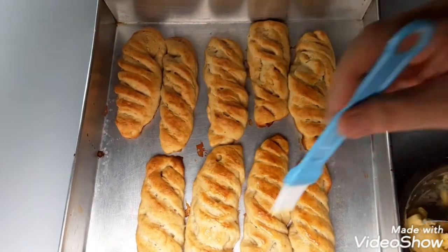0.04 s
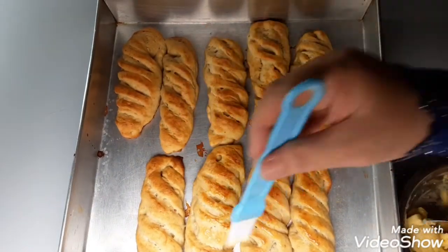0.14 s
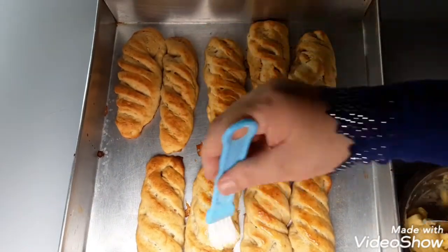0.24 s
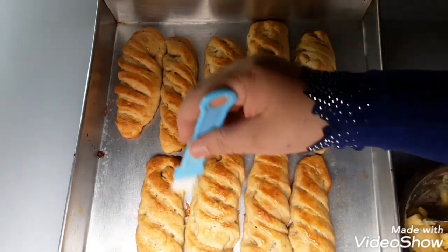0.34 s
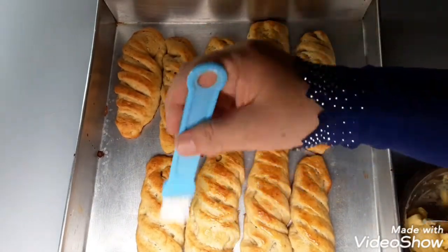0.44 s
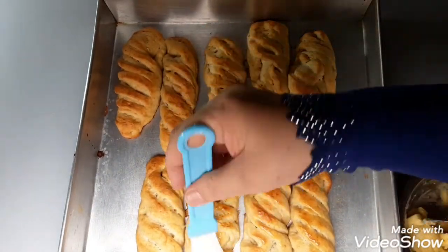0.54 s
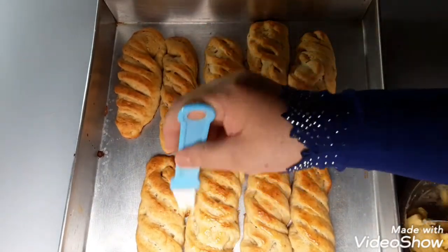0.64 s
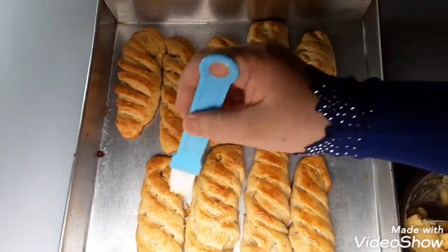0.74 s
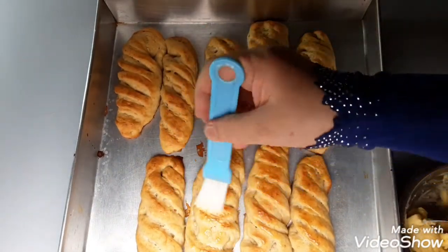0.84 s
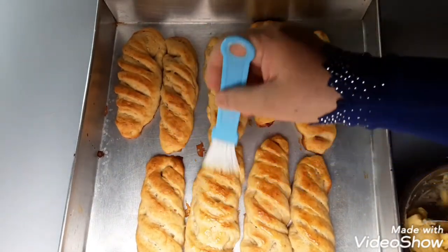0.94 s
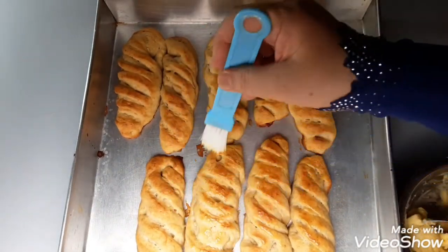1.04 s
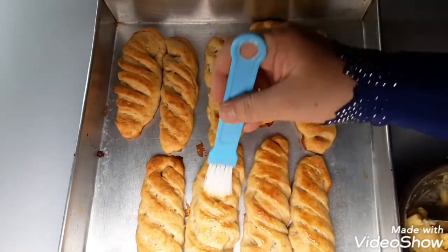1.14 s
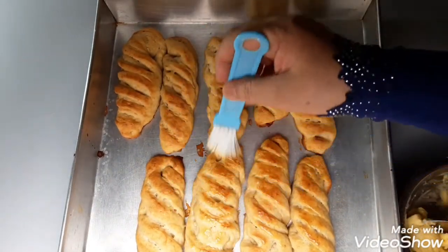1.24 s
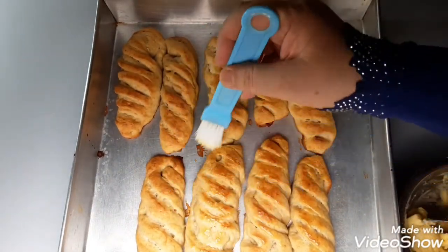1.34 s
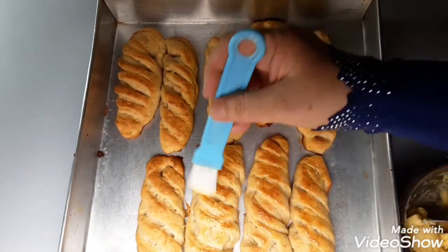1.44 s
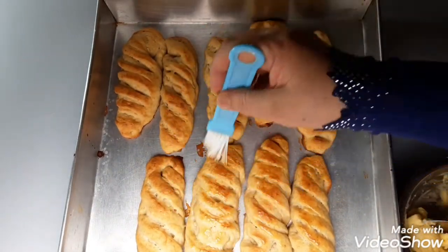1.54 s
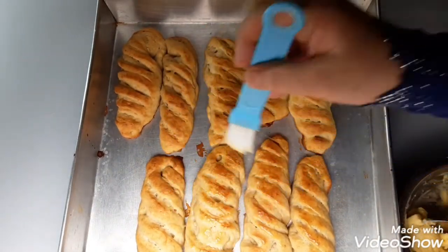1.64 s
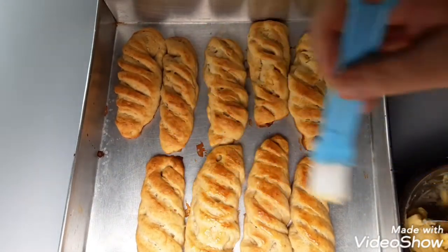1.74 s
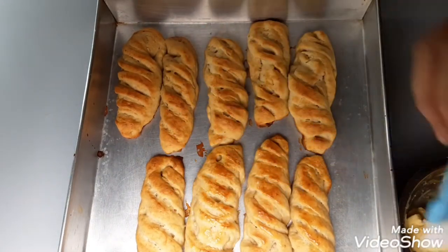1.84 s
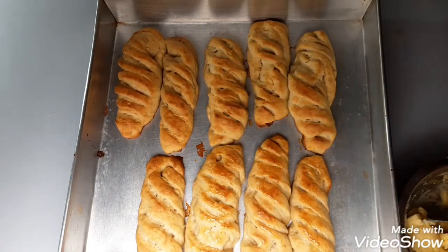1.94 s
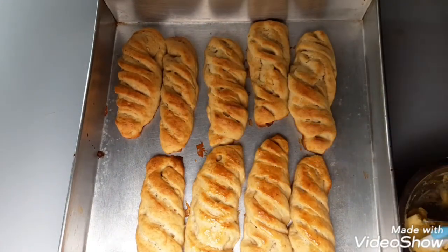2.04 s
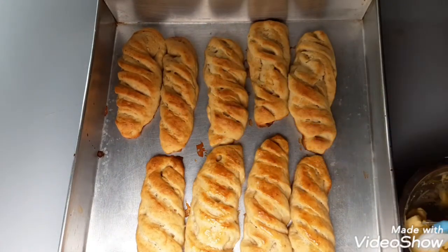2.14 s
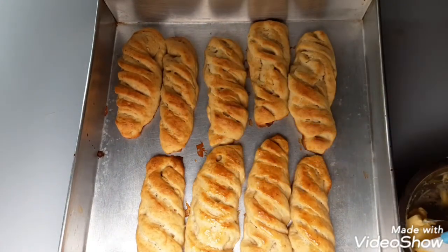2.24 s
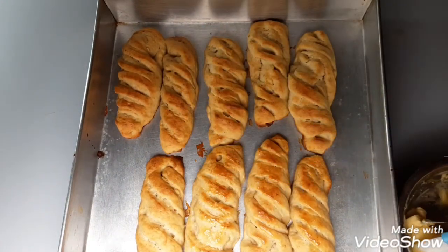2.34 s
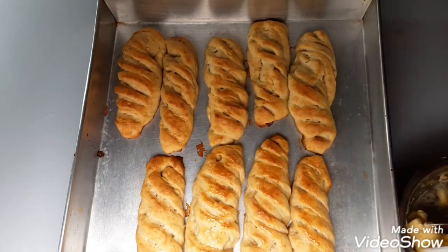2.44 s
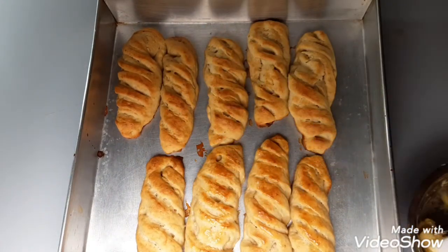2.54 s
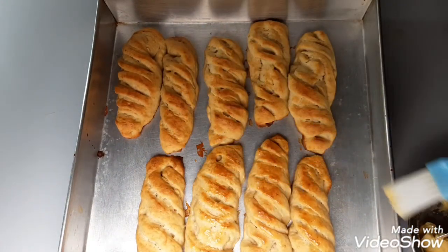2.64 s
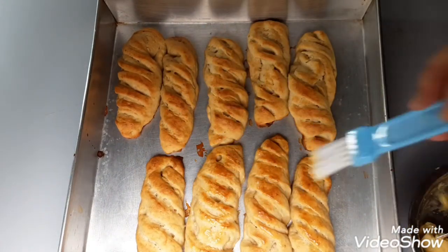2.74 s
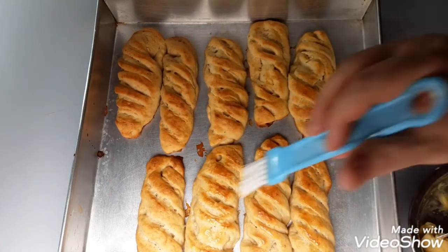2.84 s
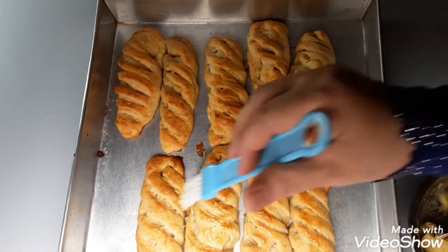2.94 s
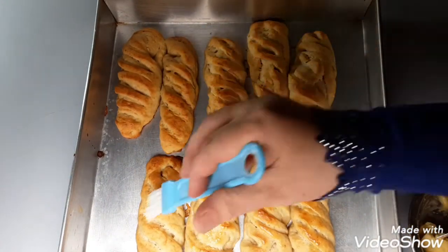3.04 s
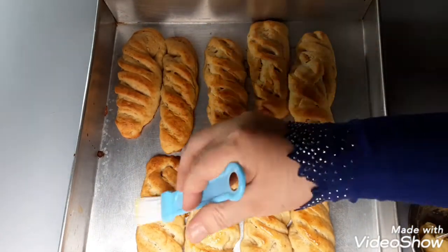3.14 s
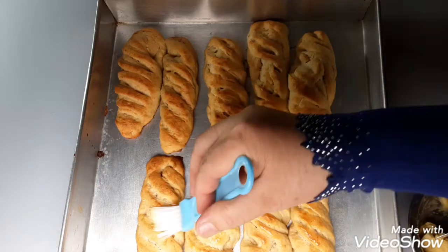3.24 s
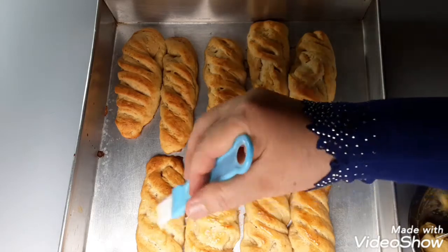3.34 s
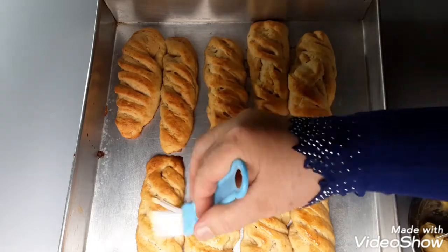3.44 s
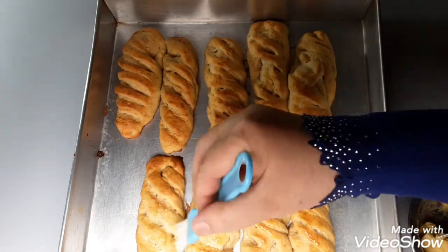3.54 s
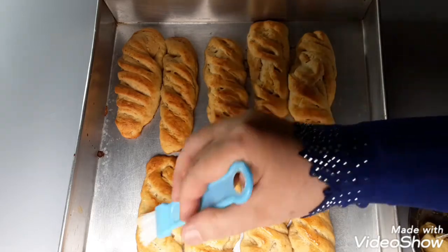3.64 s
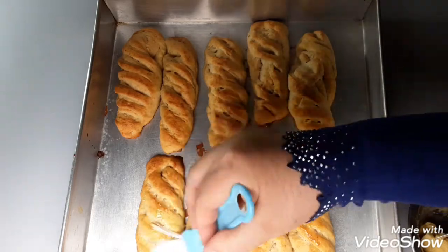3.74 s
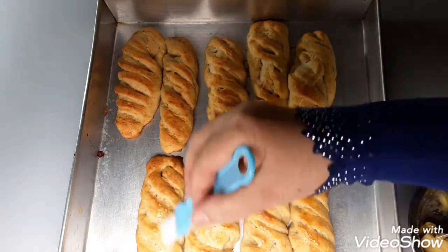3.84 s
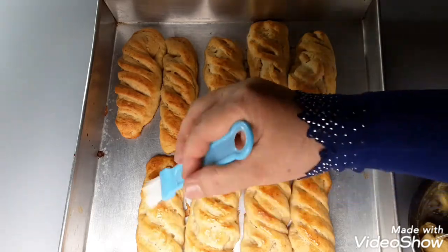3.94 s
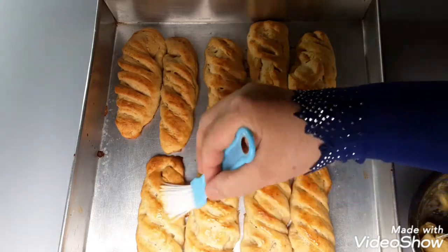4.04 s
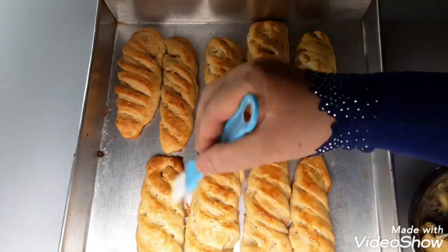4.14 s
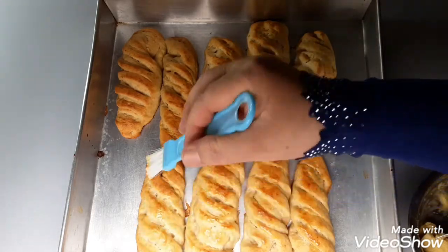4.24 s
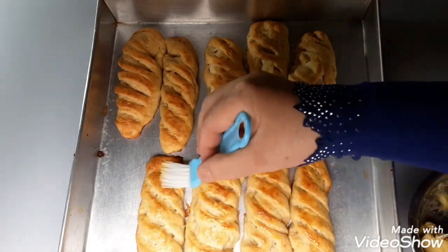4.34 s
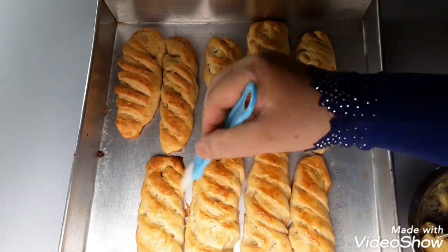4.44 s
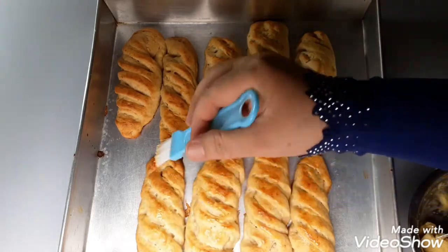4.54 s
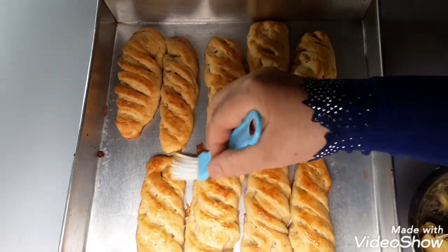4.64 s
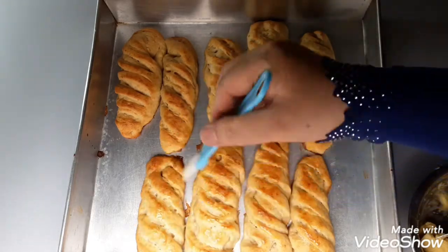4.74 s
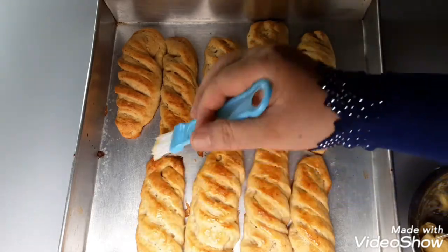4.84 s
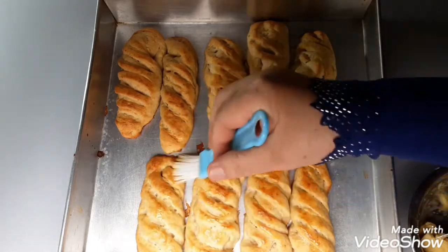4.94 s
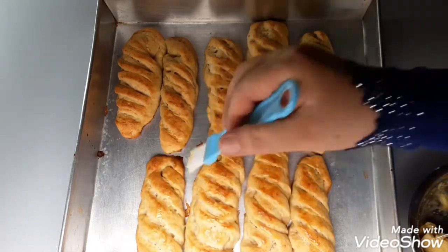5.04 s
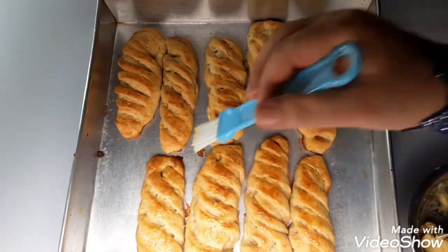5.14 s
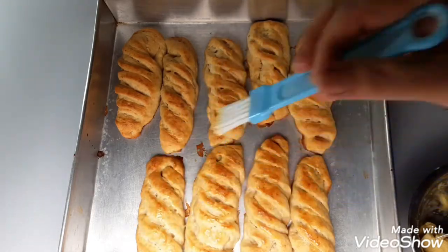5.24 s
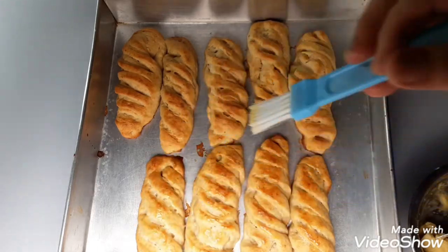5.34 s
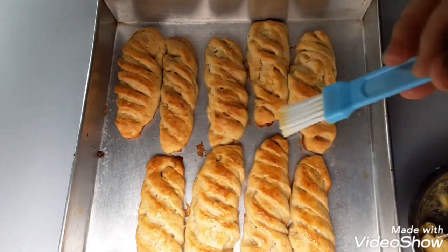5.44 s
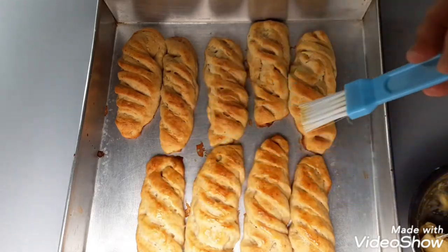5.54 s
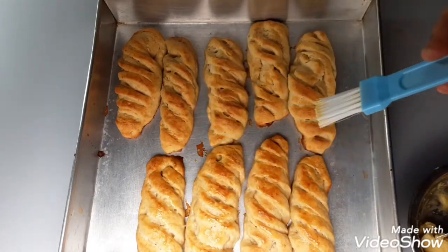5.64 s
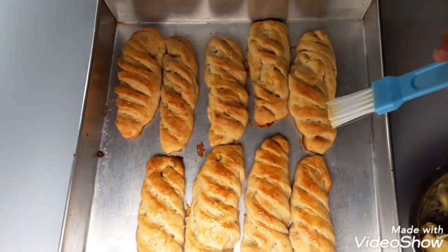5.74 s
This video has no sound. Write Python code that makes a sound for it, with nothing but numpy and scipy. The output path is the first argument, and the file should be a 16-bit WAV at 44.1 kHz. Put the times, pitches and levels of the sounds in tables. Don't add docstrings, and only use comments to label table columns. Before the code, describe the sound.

Close up in a quiet kitchen, a silicone brush swishes over baked buns in short fizzing strokes with soft splats. It pauses, dips into a bowl with several clinks, the hardest ringing brightly over a deep bump, then gentler, duller strokes resume. A knuckle knocks the microphone stand late on. Stereo, very close, with faint appliance hum.

```python
import sys
import numpy as np
from scipy import signal
from scipy.fft import rfft, irfft, next_fast_len
from scipy.io import wavfile
from scipy.ndimage import uniform_filter1d, map_coordinates

SR = 44100
rng = np.random.default_rng(int(sys.argv[2]) if len(sys.argv) > 2 else 0)


def to_linear_factor(level_db):
    exponent = np.asarray(level_db, float) / 20
    return 10 ** exponent


def int16_out(signal):
    q = np.round(np.clip(np.atleast_2d(signal).T, -1, 1) * 32767)
    wavfile.write(sys.argv[1], SR, q.astype(np.int16))


N = 255620
LEAD_SAMPLES = 7


def unit(x):
    return x / np.sqrt(np.mean(x ** 2) + 1e-20)


def along(points, hz):
    f, v = np.transpose(points)
    return np.interp(np.log(hz + 1), np.log(f + 1), v)


def curves(rows):
    s, *cols = np.transpose(rows)
    return [np.interp(np.arange(N) / SR, s, c) for c in cols]


def wobble(rate_hz):
    knots = rng.standard_normal(int(N * rate_hz / SR) + 4)
    return map_coordinates(knots, [np.arange(N) * rate_hz / SR])


def filtered(x, response):
    m = next_fast_len(x.shape[-1] + SR // 2)
    return irfft(rfft(x, m) * response(np.fft.rfftfreq(m, 1 / SR)), m)[..., :x.shape[-1]]


def spread(pair, spectrum):
    # f/Hz, correlation
    alike = [(100, 0.92), (400, 0.69), (1200, 0.045), (6000, 0.15), (9000, 0.84), (15000, 0.93)]
    turn = lambda hz: np.arccos(np.clip(along(alike, hz), -1, 1)) / 2
    mid, side = filtered(pair, lambda hz: to_linear_factor(along(spectrum, hz)) * [np.cos(turn(hz)), np.sin(turn(hz))])
    return unit(np.array([mid + side, mid - side]))


def swells(rows, swing=1, lift_db=0):
    swell_db, pointed = 26, 1.175
    s, db, rise, fall = np.transpose(rows)[:4, :, None]
    late = np.arange(0, N + 64, 32) / SR - s
    far = np.abs(late) / np.where(late < 0, rise, fall)
    gain = np.linalg.norm(to_linear_factor(db + lift_db - swing * swell_db * far ** pointed), axis=0)
    return np.interp(np.arange(N) / SR, late[0] + s[0], gain)


def ring(modes, t, scatter_db, free=1, blur=0):
    out = 0
    for hz, db, t60 in modes:
        level = to_linear_factor(db + scatter_db * rng.standard_normal() - 60 * t / (free * t60))
        drift = blur * np.cumsum(rng.standard_normal(len(t)))
        out = out + level * np.sin(2 * np.pi * hz * t + drift)
    return out


def resonances(f, modes):
    return sum((-1) ** k * to_linear_factor(g) * 1j * f * w / (c * c - f * f + 1j * f * w)
               for k, (c, w, g) in enumerate(modes))


def hum():
    # f/Hz, density/(dB per Hz)
    low_spectrum = [(18, -54), (33, -10.5), (97, -1.5), (167, -7), (221, -18), (310, -6), (370, -4.5),
                    (430, -9.5), (520, -8.5), (600, -19.5), (754, -17.5), (1500, -28.5), (1950, -59),
                    (3300, -120)]
    # f/Hz, density/(dB per Hz)
    air_spectrum = [(710, -34.5), (1200, -29), (1400, -2.5), (1680, -3), (1980, -8.5), (2040, -6.5),
                    (3290, -15.5), (7660, -15), (8630, -28.5), (14500, -13), (16000, -21.5)]
    low = to_linear_factor(-47 + 0.77 * wobble(2.99)) * spread(rng.standard_normal((2, N)), low_spectrum)
    air = to_linear_factor(-66.5 + 0.9 * wobble(5.9)) * spread(rng.standard_normal((2, N)), air_spectrum)
    return low + air


def modal(x, upper_db):
    # f/Hz, width/Hz, level/dB
    tray_modes = [(119.6, 44, 0.5), (196, 27, -1), (252, 114, -3), (390, 79, 1), (481, 74, -4.5),
                  (552, 23, -1), (633, 85, -11), (870, 190, -54)]
    modes = [(c, w, g + upper_db * (c > 450)) for c, w, g in tray_modes]
    soft = lambda f: 1 / (1 + 1j * f / (1200 * to_linear_factor(upper_db))) ** 2
    return filtered(x, lambda f: soft(f) * resonances(f, modes))


def worktop():
    # t/s, level/dB, rise/s, fall/s
    pushes = [(.36, -35, 0.041, 0.043), (.71, -43.5, 0.92, .06), (.78, -39, 0.034, 0.047),
              (1.07, -43, 0.64, 0.065), (1.16, -38, .05, 0.11), (1.3, -38, 0.018, 0.11),
              (1.48, -39, 0.066, 0.27), (1.63, -37, 0.12, 0.031), (2.216, -33.5, 0.042, 0.096),
              (2.32, -28.5, 0.044, 0.59), (2.46, -26, 0.23, 0.21), (2.593, -12, 0.05, 0.03),
              (2.698, -23.5, 0.166, 0.026), (2.784, -28.5, 0.11, 0.3), (2.94, -37, .1, .08),
              (3.426, -44, 0.038, 0.34), (3.73, -45, 0.061, 0.16), (3.93, -45, 0.25, 0.0099),
              (3.99, -49, .025, .3), (4.17, -39.5, 0.034, 0.081), (4.28, -50.5, .06, 0.62),
              (4.694, -34, 0.067, 0.062), (4.818, -34, 0.24, 0.061), (5.095, -45.5, 0.4, 0.026),
              (5.21, -42, 0.085, .06), (5.465, -48, 0.17, 0.049), (5.526, -44, .05, 0.11)]
    # t/s, level/dB
    effort = [(0, -67), (.08, -53), (.72, -40.5), (1.25, -49), (1.52, -41), (2.15, -63), (2.31, -47),
              (2.524, -35), (2.656, -32), (3.0, -52), (3.58, -56), (4.49, -46), (4.82, -42.5), (5.02, -50),
              (5.27, -52), (5.41, -47), (5.8, -52)]
    # t/s, level/dB, length/s, upper modes/dB
    bumps = [(2.168, -43.5, 0.012, 6), (2.306, -33, 0.019, 0), (2.4087, -37, 0.033, 1.5),
             (2.566, -27, 0.0356, 1), (2.625, -35, 0.06, -1), (0.29, -48, 0.016, -9),
             (1.485, -47, 0.013, 8), (3.7405, -48.5, 0.0073, 9), (0.86, -47, 0.023, -9.5),
             (1.29, -42, 0.021, -6), (4.672, -38.5, 0.00544, 0.5), (1.19, -48, 0.0068, 6)]
    sway_hz, rock_ratio, rock_db, rest_db = 94, 1.24, -11.5, -33.5
    phase = 2 * np.pi * np.cumsum(sway_hz * (1 + 0.049 * wobble(20))) / SR
    effort_db, = curves(effort)
    press = np.hypot(swells(pushes), to_linear_factor(effort_db + rest_db)) * to_linear_factor(0.67 * wobble(24.97))
    rock = to_linear_factor(rock_db + 5.1 * wobble(7.07)) * np.sin(rock_ratio * phase)
    octave = to_linear_factor(-17.0 + 2.7 * wobble(9.1)) * np.sin(2 * phase)
    sway = press * (np.sin(phase) + rock + octave)
    tray = to_linear_factor(effort_db - 7.5) * unit(modal(rng.standard_normal(N), upper_db=-3))
    for s, db, length, upper_db in bumps:
        n = round(length * SR)
        push = rng.standard_normal(SR // 10)[:n] * (1 + 0.5 * np.exp(-np.arange(n) / 150))
        body = modal(np.pad(push, (0, SR // 4)), upper_db)
        tray[round(s * SR):][:len(body)] += to_linear_factor(db) * body / np.std(body[:n])
    return sway, tray


def slips(share, spike_db, patchy_db):
    size = to_linear_factor(np.minimum(spike_db * rng.exponential(1, N), 9)) * (rng.random(N) < share)
    noise = rng.standard_normal((2, N)) * (1 + np.convolve(size, np.hanning(24), "same"))
    z = signal.stft(noise, nperseg=256)[2]
    field = uniform_filter1d(rng.standard_normal(z.shape[1:]), size=2, axis=0)
    field = uniform_filter1d(field, size=14, axis=1)
    return signal.istft(z * to_linear_factor(patchy_db * unit(field)), nperseg=256)[1][:, :N]


def brush():
    # t/s, fizz/dB, rise/s, fall/s, rub above fizz/dB
    strokes = [(.345, -40, 0.061, 0.046, -7.5), (.648, -39.5, 0.11, 0.079, -1),
               (.972, -38, 0.083, 0.069, -5), (1.184, -45.5, 0.019, 0.13, -4),
               (1.258, -43, 0.077, 0.16, -4), (1.31, -49.5, 0.047, 0.04, 4),
               (1.535, -38.5, 0.054, 0.083, -4.5), (3.262, -50, 0.11, 0.071, -1.5),
               (3.488, -47.5, 0.1, 0.15, 0), (3.572, -45.5, 0.055, 0.049, -3),
               (3.798, -46, 0.069, 0.064, -1), (4.07, -51.5, 0.051, 0.19, -2), (4.15, -48, 0.14, 0.029, -2),
               (4.374, -46.5, 0.023, 0.039, 4), (4.448, -46, 0.082, 0.045, 0.5),
               (4.668, -50, 0.085, .015, 4), (4.716, -41.5, 0.044, 0.055, 1.5),
               (5.018, -44.5, 0.06, 0.035, 4)]
    # t/s, fizz/dB, rise/s, fall/s, rub above fizz/dB
    scuffs = [(.238, -59.5, 0.027, .1, 2.5), (.55, -66, .01, 0.062, 10), (.74, -64, 0.16, 0.24, 14),
              (1.34, -63.5, 0.15, 0.057, 14), (4.8, -63.5, .1, 0.17, 7.5), (.42, -70.5, .05, 0.19, 6.5),
              (.845, -51.5, 0.016, 0.12, 1.5), (1.478, -61, 0.023, 0.089, 0), (1.65, -69.5, .1, 0.55, 4),
              (2.18, -63, 0.42, 0.068, 3.5), (2.262, -58.5, 0.15, 0.02, -6),
              (2.37, -57.5, 0.074, 0.035, 7.5), (2.5, -51, 0.075, 0.056, 3.5),
              (2.58, -52, 0.035, 0.053, 4.5), (2.8, -62, 0.64, 0.22, 12.5), (2.96, -66, .2, .03, 9),
              (3.13, -59.5, 0.027, 0.076, 8), (3.742, -53, 0.013, 0.2, 3.5), (3.864, -57, .1, 0.078, 1.5),
              (4.022, -55.5, 0.013, .04, 7), (4.34, -66, 0.017, 0.037, 3), (4.95, -55, 0.027, 0.091, 6),
              (5.06, -65, .05, 0.21, 0), (5.58, -64.5, 0.42, 0.32, 1.5)]
    # t/s, peak/dB, t60/s, brightness/dB
    dabs = [(0.2326, -33, 0.12, -4), (0.5532, -28.5, 0.056, -7), (0.8395, -36.5, 0.08, -2),
            (1.1812, -35, 0.03, 1), (1.4711, -32.5, 0.08, -4), (2.1166, -46, 0.11, -2),
            (3.1148, -41, 0.052, -1), (3.737, -34, 0.06, -15), (4.0188, -42, 0.059, -2),
            (4.3235, -28, 0.15, -13), (4.6179, -39, 0.08, -9), (4.9422, -44, 0.096, -6)]
    # t/s, peak/dB, t60/s,
    # brightness/dB
    flicks = [(1.1584, -32, 0.034, -6), (2.169, -41, 0.038, 2), (2.137, -46, 0.018, 0),
              (2.3555, -30, .02, -3), (2.4385, -26, .018, -1), (2.5672, -32, .015, -4),
              (2.657, -38, .015, 12), (2.4615, -39, .015, 9), (3.4441, -44, 0.032, 6),
              (4.1465, -28, 0.035, 0), (4.674, -24, 0.018, -1), (5.7745, -30, 0.019, -21)]
    # t/s, half length/s, f/Hz, level/dB
    squeaks = [(.72, .05, 5300, -65), (.72, .06, 1600, -57), (1.33, .03, 960, -54), (1.32, .04, 1550, -53),
               (1.348, .04, 2550, -50), (1.35, .03, 3600, -57), (1.275, .06, 6150, -61),
               (5.02, .06, 3150, -63), (3.78, .04, 2000, -58), (.245, .02, 6000, -59),
               (.34, .025, 6100, -58), (.965, .03, 6050, -60), (3.27, .04, 6100, -61)]
    # f/Hz, density/(dB per Hz)
    fizz_spectrum = [(3820, -19), (6500, -2.5), (8430, -3), (9370, -5), (11300, 1), (13900, -0.5),
                     (15500, -1.5), (16000, -31)]
    # f/Hz, density/(dB per Hz)
    rub_spectrum = [(350, -17), (600, 3.5), (779, -3.5), (1070, -1), (1200, -4.5), (1970, -0.5), (2160, -4),
                    (3170, -5.5), (6190, -5), (9000, -21.5), (11700, -27.5), (19800, -120)]
    idle_db, idle_rub_db, rub_swing = -72.5, -70, 0.71
    t = np.arange(N) / SR
    contacts = np.array(list(strokes) + list(scuffs))
    ridges_db = 1.95 * wobble(45)
    fizz = to_linear_factor(ridges_db) * np.hypot(swells(contacts), to_linear_factor(idle_db))
    rub = np.hypot(swells(contacts, rub_swing, contacts[:, -1:]), to_linear_factor(idle_rub_db))
    rub = rub * to_linear_factor(ridges_db + 0.71 * wobble(70))
    for s, db, t60, bright_db in list(dabs) + list(flicks):
        age = np.maximum(t - s, 0)
        splat = to_linear_factor(db - 9.0 - 60 * age / t60) * (1 - np.exp(-age / 0.00053))
        fizz = np.hypot(fizz, to_linear_factor(bright_db - 1.5) * splat)
        rub = np.hypot(rub, splat)
    left, right = rub * spread(slips(share=0.0085, spike_db=-5.0, patchy_db=2.6), rub_spectrum)
    song = np.zeros(N)
    for s, half, hz, db in squeaks:
        near = np.abs(t - s) < 3 * half
        swell = to_linear_factor(db) * np.exp(-((t[near] - s) / half) ** 2)
        song[near] += swell * ring([(hz, 0, 1e3)], t[near], scatter_db=2, blur=0.075)
    hiss = fizz * spread(slips(share=0.0065, spike_db=-3.5, patchy_db=2.4), fizz_spectrum)
    return hiss + [left + song, np.roll(right + song, LEAD_SAMPLES)]


def pings():
    # t/s, f/Hz, level/dB, rise/s, t60/s
    answers = [(2.305, 486, -37, 0.0066, .06), (2.313, 390, -21.5, 0.011, 0.073),
               (2.350, 2430, -31, 0.0015, 0.03), (2.355, 1800, -33, 0.0015, .03),
               (2.354, 3800, -34, .002, 0.04), (2.350, 7240, -35.5, 0.0012, 0.051),
               (2.409, 599, -29.5, 0.0023, 0.083), (2.409, 1750, -34, .001, .015),
               (2.418, 415, -20, 0.0089, 0.094), (2.419, 2420, -28.5, 0.001, 0.025),
               (2.422, 3780, -33, .001, 0.025), (2.419, 7900, -31, 0.00085, .025),
               (2.567, 930, -35.5, 0.0024, 0.078), (2.566, 377, -21, 0.003, 0.09),
               (2.570, 520, -23, .003, .07), (2.584, 610, -17, 0.005, 0.06), (2.598, 540, -21, .003, .05),
               (2.322, 520, -28, .003, .04), (2.588, 385, -19, .006, .05), (2.591, 264, -32, .008, .1),
               (2.614, 2200, -22, 0.0011, .03), (2.615, 2950, -25, .002, .03),
               (2.614, 7900, -24, .0006, .02), (4.1465, 800, -31, .0005, .015),
               (4.1497, 1600, -31, .0004, .014), (2.41, 420, -27, .001, .04), (2.636, 408, -26, 0.0099, .1),
               (2.66, 417, -24, .006, 0.081), (2.655, 244, -27, 0.007, .09), (3.736, 616, -36, .003, 0.05),
               (3.743, 750, -26.5, 0.0016, 0.021), (3.737, 1416, -40, 0.0018, 0.061),
               (4.600, 456, -34, .003, 0.034), (4.618, 428, -28, 0.0015, 0.034),
               (4.618, 1990, -35.5, .002, .025), (4.673, 650, -27, 0.00089, 0.029)]
    turn_rad = 1.4
    out, t = np.zeros((2, N)), np.arange(SR // 4) / SR
    for s, hz, db, rise, t60 in answers:
        swell = to_linear_factor(db - 60 * t / t60) * (1 - np.exp(-t / rise))
        lag = np.array([[turn_rad * hz / (hz + 250)], [0]])
        out[:, round(s * SR):][:, :len(t)] += swell * np.sin(2 * np.pi * hz * t - lag)
    return out


def shadowed(pair, lean_db):
    sides = np.array([[.5], [-.5]])
    shade = lambda f: to_linear_factor(lean_db * f ** 4 / (f ** 4 + 6500.0 ** 4) * sides)
    return filtered(np.pad(pair, ((0, 0), (64, 0))), shade)[:, 64:]


def bowl():
    # t/s, peak/dB, ring/dB, crack t60/s, treble left above right/dB
    clinks = [
        (2.3202, -33, -25.5, 0.054, -12),
        (2.3497, -23, -15, 0.04, -2),
        (2.415, -25, -23, 0.023, -13),
        (2.4185, -18, -14, 0.029, 11),
        (2.579, -32, -20, 0.084, -1),
        (2.6133, -4, -20.5, 0.02, -12),
    ]
    # f/Hz, level/dB, t60/s
    bowl_modes = [(1505, -9, .3), (2217, -11, .15), (2338, -12, .12), (2972, -8, .3), (3729, -6, .42),
                  (3762, -3, .5), (3801, -7, .42), (4037, -13, .3), (4904, -16, .4), (6024, -15, .4),
                  (4506, -12, .2), (6372, -13, .3), (6657, -7, .35), (6768, -10, .35), (6836, -9, .3),
                  (6915, -3, .36), (7050, -8, .33), (7876, -9, .36), (9292, -11, .3), (10900, -15, .3),
                  (11353, -12, .32), (11990, -12, .32), (13000, -15, .3), (13220, -15, .25)]
    # f/Hz, density/(dB per Hz)
    crack = [(530, -36), (950, -18), (1400, -6), (2390, 6), (4800, -21), (7400, 4), (10100, -6.5),
             (13200, -6), (16000, -14), (20000, -14)]
    # f/Hz, width/Hz, level/dB
    bands = [(1520, 400, -1), (2300, 500, 1), (2840, 550, 0), (3870, 450, 1.5), (5250, 1200, -6),
             (6900, 500, 0), (7930, 600, -1.5), (9240, 500, -2), (11500, 1100, -5), (12800, 870, -5.5),
             (14650, 1000, -6)]
    # f/Hz, density/(dB per Hz)
    wash = [(450, -30), (800, -2), (1500, 3), (2800, 2), (5000, -6), (7000, 3), (8500, -12), (12000, -7),
            (16000, -14)]
    held, let_go = 0.07, 1
    shimmer_db, shimmer_t60_s = -27, .5
    direct, t = np.zeros((2, N)), np.arange(SR // 2) / SR
    for s, db, ring_db, t60, lean_db in clinks:
        free = let_go if s == clinks[-1][0] else held
        noise = rng.standard_normal((2, 2, len(t)))
        tick = 1.7 * to_linear_factor(-60 * t / .009) * spread(noise[0], crack)
        crowd = unit(filtered(noise[1], lambda f: resonances(f, bands) ** 2))
        rattle = 0.97 * to_linear_factor(-60 * t / t60) * crowd
        left, right = shadowed((tick + rattle) * (1 - np.exp(-t / 0.0002)), lean_db)
        shared, own = [ring(bowl_modes, t, scatter_db=1.5, free=free, blur=0.019) for port in range(2)]
        tone = to_linear_factor(ring_db) * (shared + 0.4 * np.array([own, -own]))
        faint = 0.6 * crowd[0] + 0.58 * crowd + 0.7 * spread(noise[0, :, ::-1], wash)
        shimmer = to_linear_factor(shimmer_db - 60 * t / (shimmer_t60_s * free)) * faint
        rim = shadowed(tone + shimmer, lean_db=5) * (1 - np.exp(-t / 0.0011))
        clink = to_linear_factor(db - 7.5) * ([np.roll(left, LEAD_SAMPLES), right] + rim)
        direct[:, round(s * SR):][:, :len(t)] += clink
    return direct


def knock():
    # t/s, level/dB, left above right/dB
    s, db, lean_db = (4.1492, -24, 12)
    # t/s, f/Hz, level/dB, t60/s
    late, hz, sway_db, t60 = (4.1575, 71, -34, 0.37)
    # f/Hz, level/dB, t60/s
    stand_modes = [(141, -11, 0.055), (334, -4, 0.09), (410, -7, 0.026), (787, -3, 0.027),
                   (1130, -5, 0.021), (2120, -8, 0.016)]
    out, t = np.zeros(N), np.arange(SR // 4) / SR
    hit = to_linear_factor(db) * ring(stand_modes, t, scatter_db=-1.0) * (1 - np.exp(-t / 0.00079))
    out[round(s * SR):][:len(t)] += hit
    out[round(late * SR):][:len(t)] += to_linear_factor(sway_db - 60 * t / t60) * np.sin(2 * np.pi * hz * t)
    return out * to_linear_factor([[lean_db / 2], [-lean_db / 2]])


def room(x):
    # f/Hz, t60/s
    kitchen = [(200, 0.38), (2000, 0.35), (7000, 0.2), (14000, 0.14)]
    hz, t, z = signal.stft(rng.standard_normal((2, SR * 3 // 5)), SR, nperseg=256)
    tail = signal.istft(z * to_linear_factor(-60 * t / along(kitchen, hz)[:, None]), SR, nperseg=256)[1]
    late = np.pad(x, (200, 0))[None]
    return signal.fftconvolve(late, tail / np.linalg.norm(tail[0]), axes=1)[:, :N]


def scene():
    bristles, rim, (sway, tray), panel = brush(), bowl(), worktop(), pings()
    near = to_linear_factor(0.5) * bristles + rim + sway + tray + knock() + panel
    answer = to_linear_factor(-8.5) * room(bristles[0]) + to_linear_factor(-8) * room(rim[1])
    answer = answer + to_linear_factor(-4.5) * room(tray + to_linear_factor(-7) * panel[1])
    return near + answer + hum()


def top_cut(x):
    return signal.sosfilt(signal.butter(12, 17150, fs=SR, output="sos"), x)


def record(dry):
    # f/Hz, level/dB
    limits = [(20, -17), (45, -3), (65, 0), (15750, 0), (16000, -24), (17200, -36), (17600, -120)]
    # f/Hz, half width/Hz, level/dB
    housing = [(6050, 460, 3.5), (8340, 430, -4)]
    # f/Hz, left above right/dB
    lean = [(100, -2), (1000, -2.5), (3000, -4), (6000, -6), (10000, -3), (15000, -2.5)]
    sides = np.array([[.5], [-.5]])
    bumps_db = lambda hz: sum(db * np.exp(-((hz - c) / half) ** 2) for c, half, db in housing)
    ports = filtered(dry, lambda hz: to_linear_factor(along(limits, hz) + bumps_db(hz) + along(lean, hz) * sides))
    return top_cut(np.clip(ports, -.97, .97))


dry = scene()
out = record(dry)
int16_out(out)
```